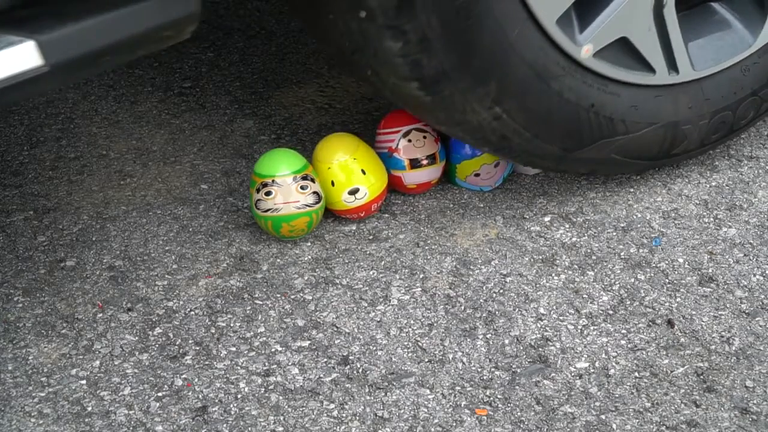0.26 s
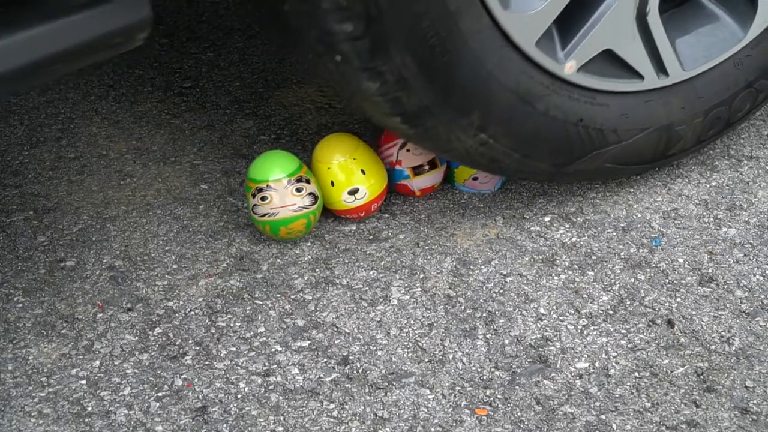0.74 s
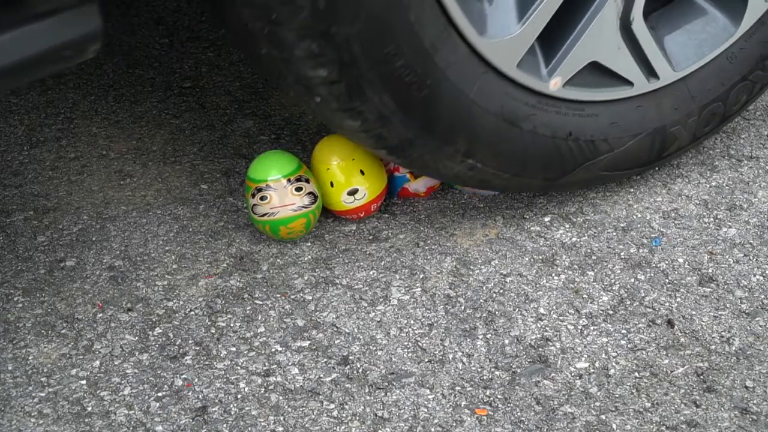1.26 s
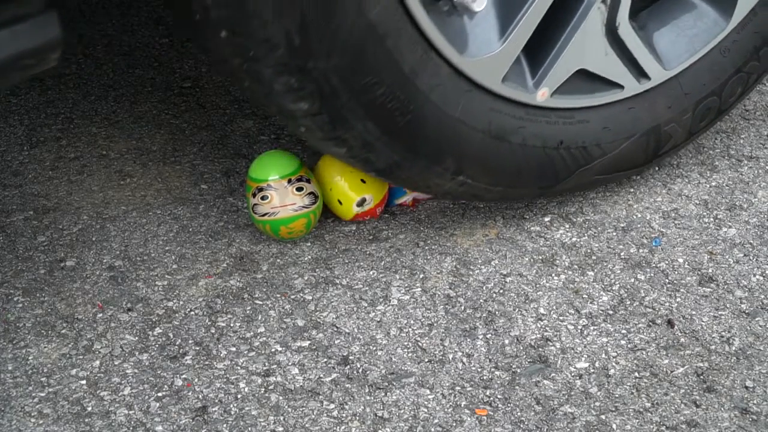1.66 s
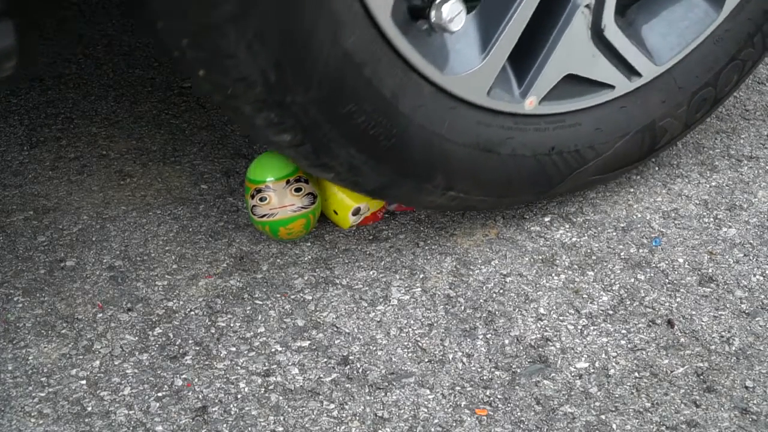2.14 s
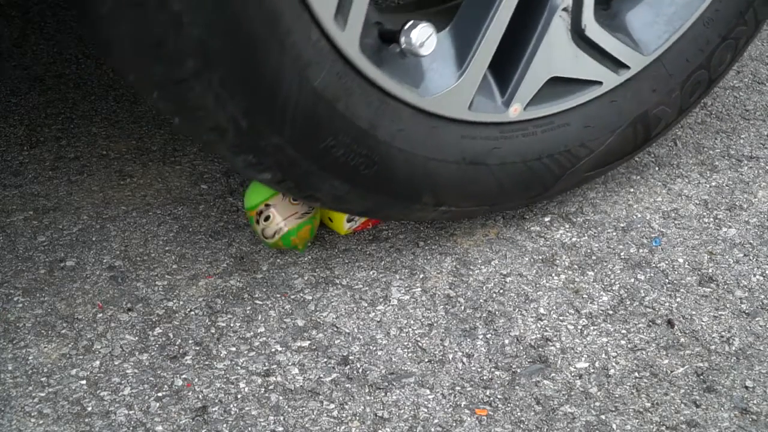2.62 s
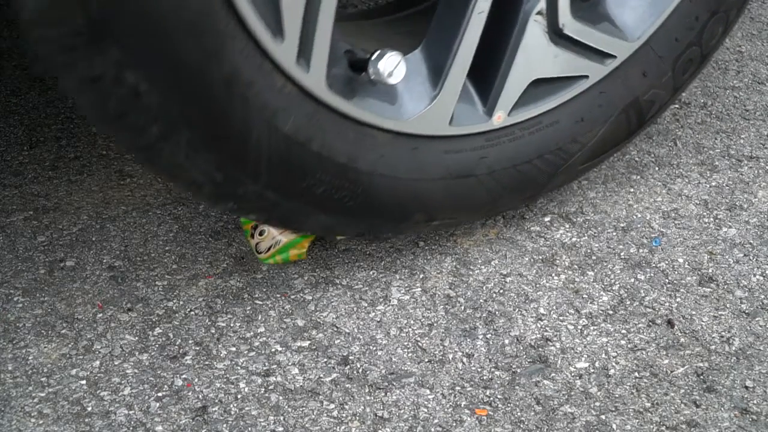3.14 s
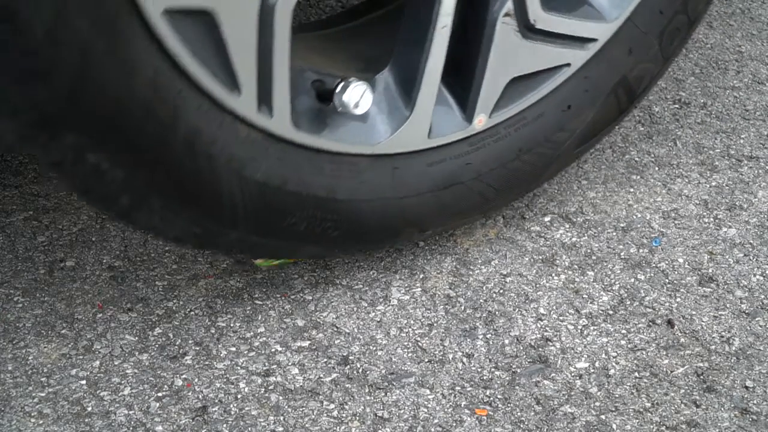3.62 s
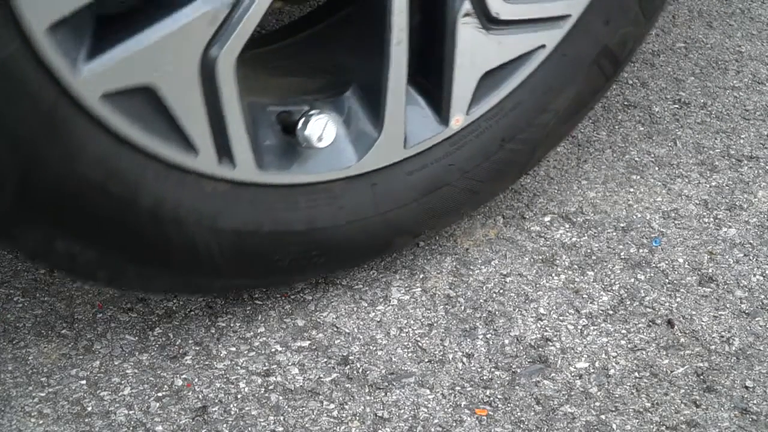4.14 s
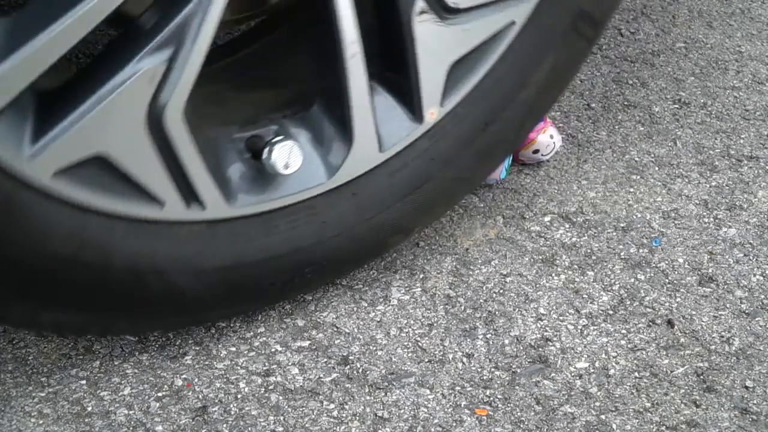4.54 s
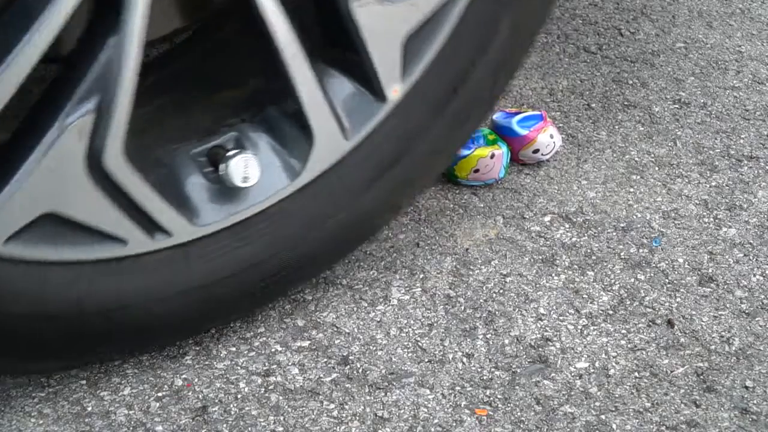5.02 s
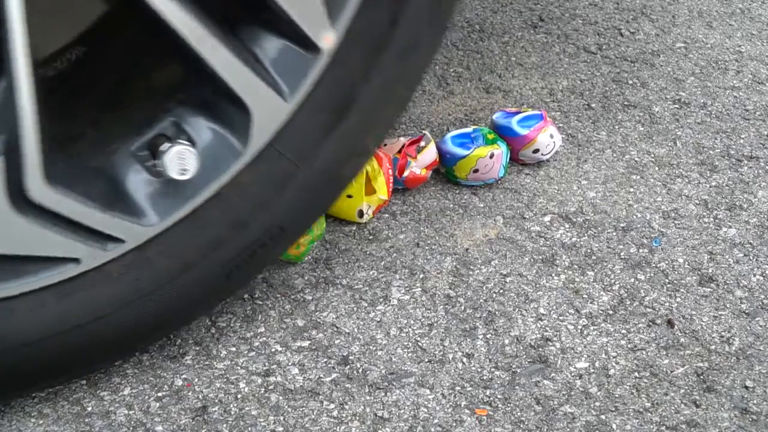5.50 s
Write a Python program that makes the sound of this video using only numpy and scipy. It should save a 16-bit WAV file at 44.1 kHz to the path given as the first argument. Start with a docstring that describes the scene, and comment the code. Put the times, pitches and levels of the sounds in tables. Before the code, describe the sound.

A car creeps over hollow plastic toys on asphalt, heard close and in stereo outdoors. A low, uneven engine idle with soft fan-like wash runs throughout, with brief body drones and chassis rumble, strongest in the first 1.3 seconds. Almost immediately, at 0.04 s, a violent hollow pop bursts out, followed by a sharp snap near 0.4 and a heavy one at 0.78. Dense dry cracks, brittle crunching and low creaks continue in uneven surges, with strong bursts around 1.47, 2.3, 2.55 and 2.9 to 3.1 s. From about 3.3 s the crushing thins into small ticks and quiet creaks, with a hollow double pop near 4.0. Another crack and boxy pop come at 4.55 to 4.64. Flattened shells then peel away with a light midrange plastic rustle, swelling near 5.06 and 5.4, among scattered weaker cracks until the end at about 5.8 s. Reflections are very short.

```python
"""Hollow toy shells buckle and crack under a slow car tyre on asphalt: brief ringing modes, noise snaps, violent bursts.
Folding walls crumple as gated noise and tiny ringing chips; behind the wheel, shells peel off with a resonant rustle.
The engine idles above as firing orders, tones and wash; a body panel drones, the chassis rumbles in low noise.
A look-ahead limiter ducks just before the loudest peaks, then the band is limited.
"""
import sys
import numpy as np
from scipy import signal
from scipy.fft import rfft, irfft, next_fast_len
from scipy.io import wavfile
from scipy.ndimage import uniform_filter1d, minimum_filter1d, map_coordinates

SR = 44100
rng = np.random.default_rng(int(sys.argv[2]) if len(sys.argv) > 2 else 0)


def store_wav(level_fs):
    """Save 16-bit WAV to argv[1]."""
    pcm = np.round(np.clip(np.atleast_2d(level_fs), -1, 1) * 32767)
    wavfile.write(sys.argv[1], SR, pcm.T.astype(np.int16))


N = 254016


def amp(db):
    """Decibels to amplitude factor."""
    return 10 ** (np.asarray(db) / 20)


def unit(x):
    """Scales to an RMS of 1."""
    return x / np.sqrt(np.mean(x ** 2) + 1e-20)


def along(points, hz):
    """Interpolates (hz, value) points on a log frequency axis."""
    f, v = np.transpose(points)
    return np.interp(np.log(hz + 1), np.log(f + 1), v)


def curves(rows):
    """One value per sample for each column after the time."""
    s, *cols = np.transpose(rows)
    return [np.interp(np.arange(N) / SR, s, c) for c in cols]


def wobble(rate_hz):
    """A smooth random curve through rate_hz knots a second."""
    knots = rng.standard_normal(int(N * rate_hz / SR) + 4)
    return map_coordinates(knots, [np.arange(N) * rate_hz / SR])


def filtered(x, response):
    """Multiplies the spectrum of x by a function of frequency."""
    m = next_fast_len(x.shape[-1] * 5 // 4)
    spectrum = rfft(x, m) * response(np.fft.rfftfreq(m, 1 / SR))
    return irfft(spectrum, m)[..., :x.shape[-1]]


def add(out, s, sound):
    """Lays a sound into out at s seconds."""
    k = round(s * SR)
    out[..., k:k + sound.shape[-1]] += sound[..., :N - k]


# Left-right likeness: hz, correlation
LIKENESS = [(100, 0.97), (300, 0.88), (700, 0.87), (1500, 0.72), (3000, 0.55), (8000, 0.51)]


def pair(noise, spectrum):
    """Colours two unrelated rows and mixes them to left and right, more alike in the bass."""
    def mid_side(hz):
        angle = np.arccos(np.clip(along(LIKENESS, hz), -1, 1)) / 2
        return amp(along(spectrum, hz)) * [np.cos(angle), np.sin(angle)]

    both = filtered(noise, mid_side)
    mid, side = both[..., :1, :], both[..., 1:, :]
    return mid + np.array([[1], [-1]]) * side


def swells(start_s, length_s, level_db, attack_s, fade_db_per_s, rest_db):
    """Level in dB of events that rise, hold for their length and fade steadily, over a resting level."""
    step = 32  # samples
    t = np.arange(0, N, step)[:, None] / SR - start_s
    faded_db = level_db - fade_db_per_s * np.maximum(t - length_s, 0)
    each = amp(faded_db) * np.clip(t / attack_s, 0, 1)
    power = np.repeat((each ** 2).sum(1), step)[:N]
    return 10 * np.log10(power + amp(rest_db) ** 2)


# Idle: time_s, firing_cycle_hz, level_db
IDLE_COURSE = [(0, 10.9, -33), (1.5, 10.1, -36.5), (2.5, 10.6, -39), (3.8, 11.6, -37.5), (4.6, 8.6, -42.5),
               (5.76, 11, -34)]
# Firing orders: multiple, rel_db
FIRING_ORDERS = [(1, 2), (2, 6), (3, 0), (4, 2), (5, -3), (6, -1), (7, 0), (8, -4), (9, -7), (11, -12),
                 (13, -14)]
# Steady accessory tones: pitch_hz, rel_db
ACCESSORY_TONES = [(100.2, -53), (122.3, -70)]
# Fan and valve wash, density per Hz: hz, rel_db
BAY_WASH = [(65, -25), (110, -7), (206, -1), (276, -8.5), (1230, -10.5), (1430, -13.5), (5270, -39.5),
            (7490, -31.5), (9000, -42.5), (11700, -76), (19800, -120)]


def engine():
    """Low orders of the idling firing cycle, two steady accessory tones and the wash of fan and valves."""
    cycle_hz, level_db = curves(IDLE_COURSE)
    phase = 2 * np.pi * np.cumsum(cycle_hz) / SR
    beat = sum(amp(rel_db + 2 * wobble(3)) * np.cos(k * phase + .3 * wobble(2) - .3 * k)
               for k, rel_db in FIRING_ORDERS)
    t = np.arange(N) / SR
    tones = sum(amp(rel_db + 2.5) * np.sin(2 * np.pi * hz * t + 0.23 * wobble(15.0))
                for hz, rel_db in ACCESSORY_TONES)
    wash = amp(-41.0 + 2.1 * wobble(2.8)) * unit(pair(rng.standard_normal((2, N)), BAY_WASH))
    return amp(level_db) * unit(beat) + tones + wash


# Panel drones: start_s, length_s, level_db
PANEL_DRONES = [(0.071, 0.18, -27.5), (0.453, 0.093, -35), (0.912, .33, -29.5), (1.703, 0.5, -40.5),
                (2.605, 0.21, -37.5)]
DRONE_HZ = 79.5
DRONE_ATTACK_S, DRONE_FADE_DB_PER_S, DRONE_REST_DB = .04, 192.5, -50.5
# Chassis rumble: time_s, level_db
CHASSIS_RUMBLE = [(0, -53), (.1, -32.5), (.7, -37), (.9, -30), (1.25, -43), (2.3, -46), (2.7, -41),
                  (3, -55.5), (4.5, -39.5), (5.76, -40)]


def body():
    """A body panel drones on one slightly unsteady note; the chassis rumbles as the wheel drops off a shell."""
    drone_db = swells(*np.transpose(PANEL_DRONES), DRONE_ATTACK_S, DRONE_FADE_DB_PER_S, DRONE_REST_DB)
    drone = np.sin(2 * np.pi * np.cumsum(DRONE_HZ + 1.5 * wobble(8)) / SR)
    rumble_db, = curves(CHASSIS_RUMBLE)
    # hz, rel_db
    low_band = [(12, -21.5), (25, 3.5), (45, 16.0), (70, -3.0), (110, 6.5), (160, -24.0), (400, -71)]
    rumble = unit(filtered(rng.standard_normal(N), lambda f: amp(along(low_band, f))))
    return amp(drone_db + 0.67 * wobble(8.9)) * drone + amp(rumble_db) * rumble


# Reverberant decay: hz, t60_s
UNDERBODY_DECAY = [(200, 0.12), (2000, 0.21), (9000, 0.066)]


def underbody(x):
    """Short answer from asphalt, tyre and floor pan as decaying noise, partly different left and right."""
    hz, t, z = signal.stft(rng.standard_normal((2, SR // 6)), SR, nperseg=128)
    decay = amp(-60 * t / along(UNDERBODY_DECAY, hz)[:, None])
    noise = signal.istft(z * decay, SR, nperseg=128)[1]
    tail = pair(noise, [(100, 0.0099), (9000, 0.0042)])  # hz, rel_db: practically flat
    delayed = np.pad(x, (90, 0))  # samples
    return signal.fftconvolve(delayed[None], tail / np.linalg.norm(tail[0]), axes=1)[:, :N]


def grit(spectrum, rate_hz, spread_db, life_s, bed_db):
    """Noise let through by random tiny fractures of very unequal size, each dying exponentially, over a bed."""
    size = amp(spread_db * np.minimum(rng.exponential(size=N), 4))
    ticks = (rng.random(N) < rate_hz / SR) * size
    gate = signal.lfilter([1], [1, -np.exp(-1 / (life_s * SR))], ticks)
    return unit(pair((unit(gate) + amp(bed_db)) * rng.standard_normal((2, N)), spectrum))


def chips(rate_hz, centre_hz, octaves, cycles, spread_db):
    """Small fractures: each rings a few cycles at its own pitch, size and left-right place."""
    count = int(rate_hz * N / SR)
    luck, k = rng.random((count, 2)), np.arange(200)
    tone, side = rng.standard_normal((2, count, 1))
    turns = np.clip(centre_hz * 2 ** (octaves * tone), 200, 8800) * k / SR
    size = amp(-spread_db * np.log(luck[:, 1:] + 0.012))
    ring = size * np.sin(2 * np.pi * turns) * np.exp(-turns / cycles) * (1 - k / 200)
    at = ((luck[:, :1] * N).astype(int) + k).ravel()
    mid, off = (np.bincount(at, (ring * w).ravel(), minlength=N)[:N] for w in (1, 0.55 * side))
    return unit(filtered(np.array([mid + off, mid - off]), lambda f: f ** 2 / (f ** 2 + (0.16 * centre_hz) ** 2)))


# Rustle behind the wheel: time_s, level_db
PEELING = [(4.3, -57.5), (4.56, -37.5), (4.72, -50), (4.9, -40.5), (5.01, -44.5), (5.06, -29), (5.2, -39.5),
           (5.4, -31.5), (5.55, -37.5), (5.76, -37.5)]
# Flattened-shell resonances: centre_hz, width_hz, rel_db
FLAT_SHELL_MODES = [(1000, 370, 5), (3000, 900, 0.5), (4360, 1000, -8)]


def release():
    """Behind the wheel the flattened shells peel off the tread with a fine rustle in their own resonances."""
    def modes(f):
        return sum((-1) ** k * amp(rel_db) * 1j * f * width / (centre ** 2 - f * f + 1j * f * width)
                   for k, (centre, width, rel_db) in enumerate(FLAT_SHELL_MODES))

    near_flat = [(100, 0.0068), (9000, 0.002)]  # hz, rel_db
    rustle = filtered(grit(near_flat, 900., spread_db=1.0, life_s=0.0011, bed_db=-5.5), modes)
    return amp(curves(PEELING)[0] + 1.8 * wobble(35)) * unit(rustle)


# Wall folds: start_s, length_s, crunch_db, fizz_above_crunch_db, creak_db, creak_length_s
WALL_FOLDS = [(0.044, 0.075, -36.5, -2.5, -28, 0.023), (0.196, 0.024, -34.5, -4, -48, .02),
              (0.289, 0.029, -35.5, -6, -41, 0.018), (0.371, 0.011, -29, -9, -36, .01),
              (0.429, 0.06, -48, 5, -42.5, 0.038), (0.666, 0.035, -37, -3, -37, .03),
              (0.709, 0.092, -28.5, -5, -26.5, .01), (0.774, 0.14, -32, -3.5, -33.5, 0.043),
              (0.899, .22, -32, -6.5, -46, .1), (1.174, 0.038, -38, 4, -31, .02),
              (1.234, 0.072, -33, -0.5, -35, 0.059), (1.322, 0.056, -38.5, 4.5, -30.5, .01),
              (1.374, 0.02, -38, 3, -30, 0.009), (1.463, 0.1, -30.5, -4.5, -22.5, 0.035),
              (1.617, 0.088, -30.5, -3.5, -34, .03), (1.726, 0.045, -31, 1, -27, 0.014),
              (1.787, .11, -35.5, -4, -50, .05), (1.905, 0.052, -34.5, -11.5, -28, .01),
              (1.977, 0.083, -39.5, 4.5, -26, 0.018), (2.086, 0.032, -35.5, -6.5, -27.5, .01),
              (2.168, 0.081, -30.5, -0.5, -28.5, 0.073), (2.25, 0.055, -29.5, 0.5, -26.5, 0.035),
              (2.341, 0.14, -37.5, -4.5, -52, .05), (2.388, 0.028, -51, -2, -31.5, .02),
              (2.561, 0.1, -33, 3, -38, 0.018), (2.644, 0.27, -33.5, -1.5, -42, 0.11),
              (2.906, 0.072, -33.5, 1, -27, 0.042), (3.066, 0.14, -40.5, -8.5, -42, 0.063),
              (3.249, 0.019, -32.5, -20, -34.5, 0.018), (3.32, 0.048, -45.5, -14, -34, 0.023),
              (3.638, 0.17, -47, 3, -40, 0.15), (3.829, 0.039, -41, -0.5, -40.5, 0.033),
              (3.959, .05, -58, -6, -36, 0.047), (4.028, 0.051, -36, -3.5, -27, 0.021),
              (4.09, 0.016, -48, -1, -48, 0.018), (4.308, 0.13, -55, -12, -38.5, 0.11),
              (4.468, 0.054, -45, 0, -36, 0.068), (4.536, 0.093, -35, -4, -32, 0.068),
              (4.641, 0.029, -38, -4, -40, 0.032), (4.744, 0.032, -45.5, 1, -40.5, .03),
              (4.799, 0.035, -36, -2.5, -34.5, 0.024), (4.859, 0.085, -43.5, 5, -37, .08),
              (4.974, 0.034, -43, 5.5, -37, 0.023), (5.024, 0.13, -39.5, 6.5, -31, 0.11),
              (5.147, 0.051, -40.5, 2.5, -32.5, 0.086), (5.242, 0.079, -37.5, -1.5, -42.5, 0.13),
              (5.384, 0.12, -36.5, 2, -32, 0.14), (5.562, .04, -51, 0, -36.5, 0.049)]
# Steady pressure between folds: time_s, crunch_db, creak_db
STEADY_PRESSURE = [(0, -43, -46.5), (2.0, -48.5, -46.5), (3.3, -45, -51.5), (3.6, -52.5, -49.5),
                   (3.92, -52.5, -51), (4.25, -52, -55), (4.72, -51.5, -41), (5.3, -43.5, -45),
                   (5.76, -48, -40)]
FOLD_ATTACK_S, FOLD_FADE_DB_PER_S, CREAK_FADE_DB_PER_S = 0.0089, 305, 298.5
REST_FIZZ_ABOVE_CRUNCH_DB = 1


def pressure():
    """Crunch and fizz last as long as a wall folds; the creak starts with them and has its own length."""
    start_s, length_s, crunch_db, fizz_db, creak_db, creak_length_s = np.transpose(WALL_FOLDS)
    rest_db, creak_rest_db = curves(STEADY_PRESSURE)
    fold = FOLD_ATTACK_S, FOLD_FADE_DB_PER_S
    return (swells(start_s, length_s, crunch_db, *fold, rest_db),
            swells(start_s, length_s, crunch_db + fizz_db, *fold, rest_db + REST_FIZZ_ABOVE_CRUNCH_DB),
            swells(start_s, creak_length_s, creak_db, FOLD_ATTACK_S, CREAK_FADE_DB_PER_S, creak_rest_db))


# Noise spectra, density per Hz: hz, rel_db
CRUNCH_SPECTRUM = [(300, -120), (700, -24), (1000, -2), (2000, -0.5), (3000, 2), (4500, -9), (9000, -69.5)]
FIZZ_SPECTRUM = [(1200, -120), (2400, 3.5), (3300, 3.5), (5000, 5.5), (7800, -3.5), (9000, -11.5),
                 (10200, -82.5), (13000, -120)]
CREAK_SPECTRUM = [(100, -56.5), (180, -8.5), (280, 2), (450, -0.5), (800, -5.5), (1200, -8.5), (3000, -48)]


def crumple():
    """The flattened walls keep folding, splitting and scraping over the asphalt, in short uneven surges."""
    crunch_db, fizz_db, creak_db = pressure()
    surge_db, bed_db = 1.5 * wobble(45), -5
    crunch = grit(CRUNCH_SPECTRUM, 400., spread_db=3.5, life_s=0.0018, bed_db=bed_db)
    crunch = crunch + amp(-2.5) * chips(600., 2020.0, octaves=0.52, cycles=3.1, spread_db=6)
    fizz = grit(FIZZ_SPECTRUM, 600., spread_db=3.0, life_s=0.00075, bed_db=bed_db)
    fizz = fizz + amp(-7.0) * chips(530.0, 4920.0, octaves=0.29, cycles=14.0, spread_db=6.5)
    creak = grit(CREAK_SPECTRUM, 150., spread_db=5.5, life_s=0.0046, bed_db=bed_db)
    creak = creak + amp(-2.5) * chips(250., 623.0, octaves=0.55, cycles=0.81, spread_db=6)
    fizz_db = fizz_db + surge_db + 1.18 * wobble(30)
    return amp(crunch_db + surge_db) * crunch + amp(fizz_db) * fizz + amp(creak_db) * creak


SMALL_ABOVE_CRUNCH_DB, SMALL_SPREAD_DB = 16., 2
SMALL_HZ, SMALL_SPREAD_OCTAVES, SMALL_BRIGHT_DB = 2450, 0.68, -6.


def small_cracks(count):
    """Crack rows at random moments, louder while the crunch is loud."""
    s, luck = rng.random(count) * (N - 1) / SR, rng.standard_normal((count, 3))
    crunch_db = pressure()[0][(s * SR).astype(int)]
    peak_db = crunch_db + SMALL_ABOVE_CRUNCH_DB + SMALL_SPREAD_DB * luck[:, 0]
    centre_hz = np.clip(SMALL_HZ * 2 ** (SMALL_SPREAD_OCTAVES * luck[:, 1]), 700, 8000)
    return np.transpose([s, peak_db, centre_hz, SMALL_BRIGHT_DB + 6 * luck[:, 2]])


# Cracks: time_s, peak_db, centre_hz, brightness_db
WALL_CRACKS = [(.012, -19, 900, -11), (.036, -3, 710, 0), (.0745, -13, 1730, -21), (.0957, -18, 3980, -7),
               (.166, -12, 3650, -9), (.213, -12.5, 3170, -16), (.293, -12, 1270, -16),
               (.3147, -14, 1740, -12), (.38, -11, 3060, -1), (.39, -6, 5400, -6), (.445, -12, 2200, 13),
               (.4762, -21, 3250, 5), (.4953, -9.5, 3040, -9), (.5035, -14, 1550, -10),
               (.5484, -8.5, 2450, -8), (.5693, -23, 2650, -25), (.6072, -22, 3640, -4),
               (.6505, -17.5, 5470, -1), (.6788, -15.5, 3790, -8), (.7121, -7.5, 2050, -6),
               (.7482, -11, 1740, 0), (.7794, -8, 1490, -1), (.799, -14, 1680, -8), (.8066, -6, 1570, -7),
               (.8252, -10, 1980, -12), (.8434, -11, 2000, -1), (.8635, -13, 1900, 0),
               (.8753, -15, 2840, -1.5), (.9438, -16, 2710, 2), (.9801, -10.5, 2150, -2),
               (.9994, -10.5, 1570, -2), (1.0129, -9.5, 2960, -10), (1.0348, -13, 2930, -8),
               (1.0518, -13.5, 2800, -13), (1.0798, -10, 2240, -15), (1.1118, -18, 1310, -17),
               (1.1362, -17.5, 2610, 7), (1.173, -11.5, 2490, -10), (1.1894, -12, 900, 4),
               (1.2276, -12, 1670, -23), (1.2379, -7, 3660, 15), (1.2562, -14, 5920, -5),
               (1.2812, -12, 2860, -39), (1.2921, -7.5, 3470, 5), (1.3223, -7.5, 790, -4),
               (1.3348, -13, 3170, -3), (1.384, -15, 1960, -19), (1.462, -15.5, 2200, -9),
               (1.4713, -1.5, 3040, 10), (1.5077, -11, 2200, -10), (1.5232, -12, 900, -7),
               (1.5802, -9.5, 3280, -6.5), (1.6286, -13.5, 710, -6), (1.6778, -9, 1560, -10),
               (1.712, -16, 1660, -10), (1.738, -10, 3050, 1), (1.8264, -14, 2280, -5),
               (1.8665, -22, 2520, -8), (1.914, -14.5, 1370, -27), (1.9858, -7, 710, -10),
               (2.0453, -16.5, 710, -29), (2.1005, -17, 3880, 22), (2.1253, -14.5, 8100, 7),
               (2.178, -10.5, 3280, -5.5), (2.2046, -15, 2540, 5), (2.2201, -6.5, 1490, -19),
               (2.2422, -8, 3170, -9), (2.2503, -7, 2930, -16), (2.2615, -3.5, 1120, -1),
               (2.2771, -6, 3860, -12), (2.2997, -2.5, 3100, 16), (2.319, -13, 5150, -22),
               (2.3946, -21, 1280, -4), (2.4598, -15, 2000, -21), (2.5238, -10, 5640, -3),
               (2.5596, -7, 1010, -3.5), (2.5849, -13.5, 1460, -6), (2.6004, -7, 2590, -12),
               (2.6214, -13, 1640, -12), (2.658, -21, 6700, 10.5), (2.7013, -8, 2220, 1),
               (2.739, -10, 3600, 4), (2.783, -14, 2510, -9), (2.8253, -12, 2140, -6),
               (2.8625, -24, 1500, -4), (2.8836, -9.5, 5640, 1), (2.9071, -6.5, 2720, -5),
               (2.9268, -2, 760, -5), (2.978, -13, 2330, -27), (3.0023, -12, 2170, -19),
               (3.0352, -13, 2240, -6), (3.044, -13, 1370, -3), (3.074, -3.5, 5830, -8.5),
               (3.0862, -11, 2550, -14), (3.1381, -15.5, 810, -10), (3.193, -12.5, 2400, -11),
               (3.2077, -19, 1310, -13), (3.2461, -5.5, 950, -14), (3.3296, -19.5, 2450, -17),
               (3.4217, -27, 5120, -5), (3.4611, -20.5, 3290, -14), (3.4886, -19.5, 1900, -16),
               (3.52, -22.5, 1780, -11), (3.5509, -22.5, 5760, 1), (3.568, -23, 1680, -3),
               (3.6334, -14.5, 840, -12), (3.6421, -23, 2860, 9), (3.6752, -18.5, 1080, 6),
               (3.6919, -19.5, 910, -35), (3.731, -19.5, 1010, -2), (3.7602, -16.5, 710, -3),
               (3.8445, -10.5, 3440, -12), (3.8669, -19, 3120, -5), (3.958, -9, 1340, -1.5),
               (3.9759, -14.5, 815, -30), (4.0194, -28, 730, -30), (4.0444, -19, 760, -12),
               (4.109, -11.5, 3030, -2), (4.1232, -20.5, 2760, -17), (4.2091, -24, 2760, 6),
               (4.387, -19, 3120, -9), (4.4412, -22.5, 1380, -4), (4.4756, -17.5, 710, -6),
               (4.5374, -18, 3380, 5), (4.547, -13, 710, -21), (4.5563, -6, 2950, -2),
               (4.5823, -14, 3940, 6), (4.5985, -9, 716, 4), (4.639, -17, 1250, -26),
               (4.7997, -24, 7400, 0), (4.854, -18, 6850, -6), (4.9674, -21, 4970, -3),
               (4.9792, -14, 1290, -4), (5.1173, -24, 2860, -12), (5.1448, -11.5, 1360, -3),
               (5.2168, -13, 2860, -11), (5.2423, -14.5, 1060, -19), (5.2694, -16.5, 1180, 2),
               (5.3012, -14, 3470, -23), (5.3378, -25, 2200, -11), (5.433, -19, 800, -6),
               (5.482, -24, 900, -17), (5.5176, -11.5, 860, -22), (5.5802, -17.5, 2970, -6)]
# Snap spectrum, density per Hz: hz, rel_db
SNAP_SPECTRUM = [(200, -6), (600, 0.5), (1500, 3.5), (3500, -0.5), (7800, -7.5), (9000, -22.5),
                 (10200, -79.5), (13000, -120)]
SPIKE_T60_S, TAIL_T60_S, TAIL_DB = 0.0048, .026, -15.5
EVEN_BRIGHT_DB = -7.5  # brightness that leaves the snap spectrum untilted


def cracks():
    """Each crack is a sharp noise spike with a rattling tail, lifted round its own centre."""
    out, lead = np.zeros((2, N)), 64  # samples of room before the onset
    rows = np.transpose([*WALL_CRACKS, *small_cracks(count=110)])
    s, peak_db, hz, bright_db = rows[..., None, None]
    t = np.arange(SR // 16) / SR
    shape = (amp(-60 * t / SPIKE_T60_S) + amp(TAIL_DB - 60 * t / TAIL_T60_S)) * (1 - np.exp(-t / 0.00028))
    noise = np.pad(shape * rng.standard_normal((len(s), 2, len(t))), ((0, 0), (0, 0), (lead, 0)))

    def lift(f):
        return 1 + 1.5 * 1j * f * hz * 0.38 / (hz * hz - f * f + 1j * f * hz * 0.33)

    def tilt(f):
        return amp((bright_db - EVEN_BRIGHT_DB) * np.tanh(1.7 * np.log((f + 1) / 3500)) / 2)

    sound = filtered(pair(noise, SNAP_SPECTRUM), lambda f: lift(f) * tilt(f))
    sound = amp(peak_db) * sound / np.abs(sound.mean(1, keepdims=True)).max(2, keepdims=True)
    for at, one in zip(s.ravel(), sound):
        add(out, max(at - lead / SR, 0), one)
    return out


# Buckling pops: time_s, ring_db, shell_hz, t60_s, tyre_thump_db
BUCKLES = [(.011, -9.5, 213, 0.032, -34), (.033, .5, 240, 0.034, -30), (.301, -20.5, 235, 0.074, -51),
           (.709, -6, 372, 0.041, -45), (.747, -15, 690, 0.055, -33), (.779, -6.5, 228, 0.072, -20),
           (1.186, -17, 810, 0.036, -45), (1.319, -16, 353, .039, -42), (1.379, -2.5, 327, 0.041, -23),
           (1.469, -6, 242, .052, -39), (1.628, -12, 302, 0.043, -50), (1.735, -11, 514, 0.043, -45),
           (1.985, -4.5, 278, 0.047, -43), (2.04, -18.5, 483, .05, -41), (2.097, -11, 350, 0.026, -40),
           (2.175, -14, 197, 0.1, -14), (2.263, -16, 463, .043, -29), (2.392, -20.5, 455, 0.052, -45),
           (2.555, -2, 214, .034, -36), (2.668, -17, 464, 0.045, -29), (2.735, -12.5, 198, 0.038, -28),
           (2.904, -10, 262, 0.048, -35), (2.923, -2.5, 683, 0.025, -25.5), (3.077, -20, 250, 0.089, -43),
           (3.132, -16.5, 735, 0.039, -50), (3.758, -17.5, 536, .06, -53), (3.84, -19.5, 540, 0.05, -41),
           (3.971, -17, 756, .05, -36), (3.994, -22, 278, .05, -31), (4.017, -10, 746, 0.025, -34),
           (4.037, -2, 704, 0.027, -20), (4.545, -18.5, 345, 0.096, -48), (4.593, -20, 700, .04, -38),
           (4.633, -6.5, 360, .09, -21), (4.806, -20, 455, 0.11, -55), (5.141, -17, 740, 0.051, -50),
           (5.428, -18, 780, 0.039, -47), (5.477, -23, 710, 0.038, -46), (5.512, -14.5, 350, 0.051, -37)]
# Shell modes: pitch_ratio, rel_db, t60_share
SHELL_MODES = [(1, 0.5, 0.57), (1.502, -3, 0.55), (2, -14, 0.63), (3.5, -4, 0.085)]
OVERTONES_DB = -10  # added to every mode but the lowest
# Air inside the tyre: pitch_hz, rel_db, t60_s
TYRE_AIR = [(186.6, -9, 0.34), (208.5, 2, 0.081)]


def pops():
    """A wall buckles: the hollow shell rings briefly in its few modes and the air in the tyre thumps."""
    out, t = np.zeros(N), np.arange(SR // 6) / SR
    for s, ring_db, hz, t60_s, thump_db in BUCKLES:
        ring = 0
        for k, (ratio, rel_db, share) in enumerate(SHELL_MODES):
            level_luck, pitch_luck = rng.normal(size=2)
            if k > 0:
                rel_db = rel_db + OVERTONES_DB + 2.1 * level_luck
                ratio = ratio * (1 + 0.084 * pitch_luck)
            ring = ring + amp(rel_db - 60 * t / (share * t60_s)) * np.sin(2 * np.pi * hz * ratio * t)
        thump = sum(amp(rel_db - 60 * t / life_s) * np.sin(2 * np.pi * f * t) for f, rel_db, life_s in TYRE_AIR)
        attack = 1 - np.exp(-t / .0007)
        add(out, s + .0025, -(amp(ring_db) * ring + amp(thump_db) * thump) * attack)
    return out


# A shell gives way at once: time_s, level_db, pitch_hz
COLLAPSES = [(0.0356, 27, 690), (0.3885, 9.5, 3050), (0.7795, 29.5, 1260), (1.4724, 19, 2140),
             (2.3, 14, 3560), (2.558, -13.5, 1940), (3.076, -4, 3260), (4.6356, 13.5, 377)]


def bursts():
    """A fast-dying sine, most of them far louder than the rest; the higher, the more noise splinters in."""
    out, t = np.zeros(N), np.arange(SR // 50) / SR
    for s, level_db, hz in COLLAPSES:
        height = (hz / 2000) ** 2
        splinter = .4 * height / (1 + height) * rng.standard_normal(len(t))
        envelope = amp(level_db - 60 * t / .003) * (1 - np.exp(-t / .0004))
        add(out, s, -envelope * (np.sin(2 * np.pi * hz * t) + splinter))
    return out


SHELL_LOW_HZ = 140.


def radiated(x):
    """Small shells radiate little below SHELL_LOW_HZ: a second-order high-pass."""
    return filtered(x, lambda f: (1j * f) ** 2 / (SHELL_LOW_HZ ** 2 - f * f + 1.3j * f * SHELL_LOW_HZ))


def scene():
    """Toys under the wheel, car above; cracks and pops also excite the underbody."""
    hits = cracks() + radiated(pops())
    echo = amp(-4.5) * underbody(hits.mean(0))
    return hits + echo + radiated(bursts()) + crumple() + engine() + body() + release()


CEILING_DB, TOP_HZ = -3, 10304


def record(dry):
    """The limiter sees 6 ms ahead, ducks at once and lets go within moments; then the band limit."""
    need = np.minimum(1, amp(CEILING_DB) / (np.abs(dry).max(0) + 1e-9))
    ahead, hold = 270, 30  # samples
    held = minimum_filter1d(np.pad(need, (0, ahead), mode="edge"), size=ahead + hold + 1)
    gain = uniform_filter1d(held[(ahead - hold) // 2:][:N], size=40)
    return filtered(dry * gain, lambda hz: 1 / (1 + (hz / 9000) ** 60) ** .5 * (hz < TOP_HZ))


dry = scene()
out = record(dry)
store_wav(out)
```